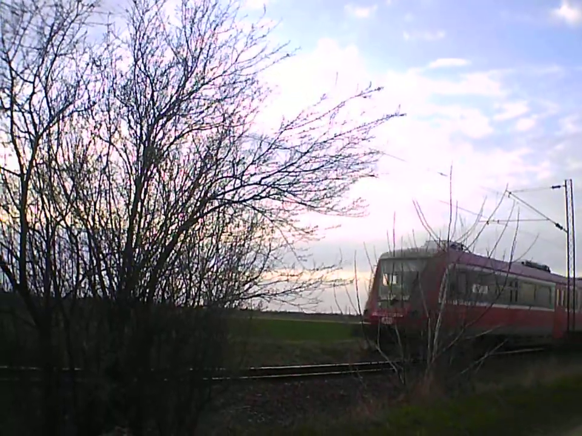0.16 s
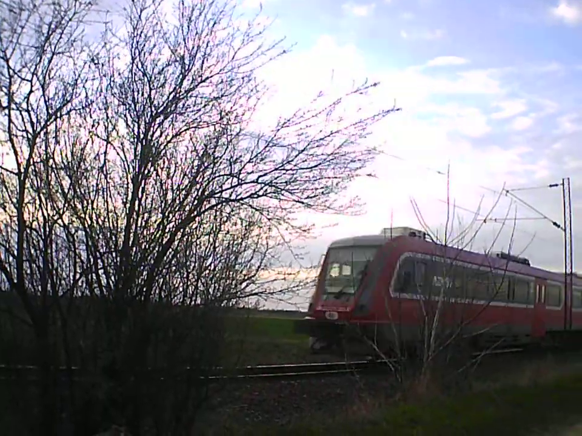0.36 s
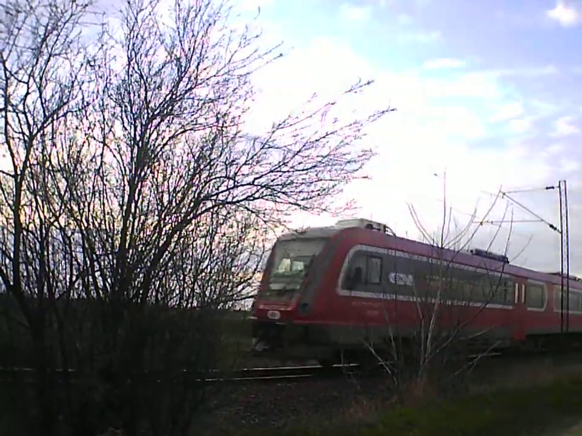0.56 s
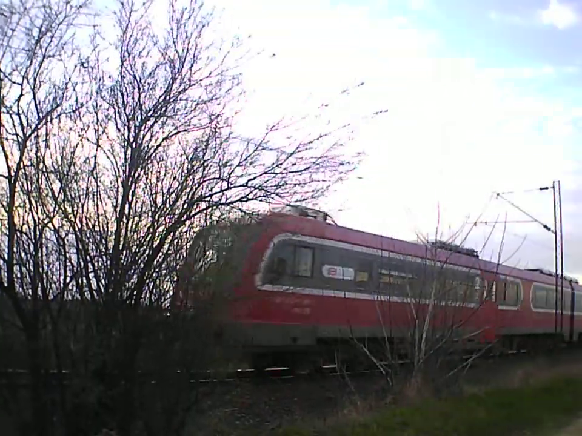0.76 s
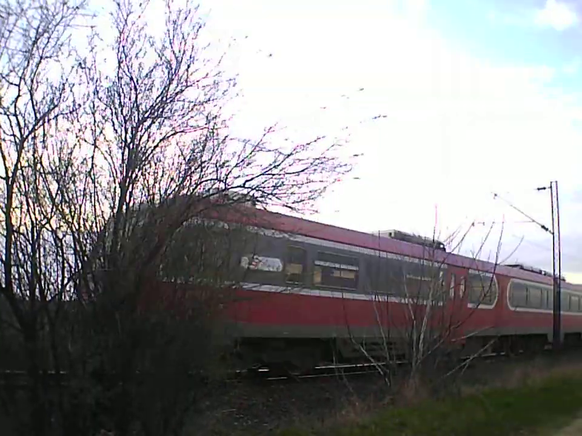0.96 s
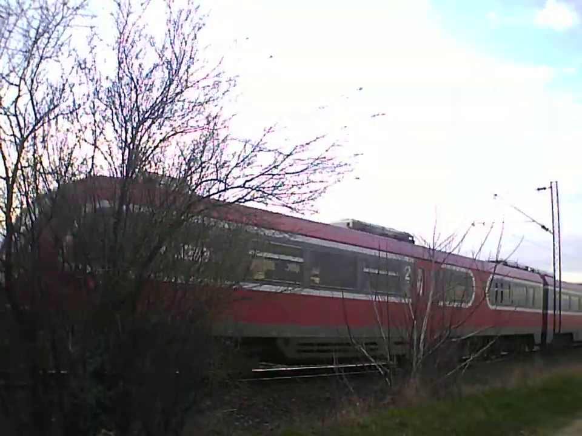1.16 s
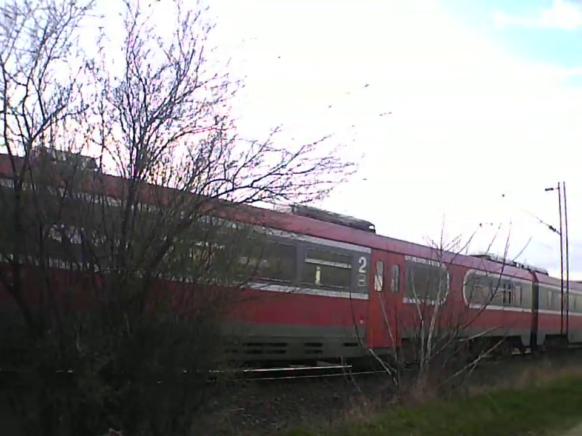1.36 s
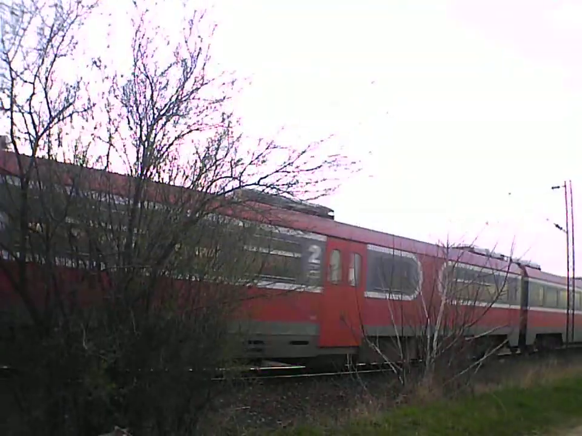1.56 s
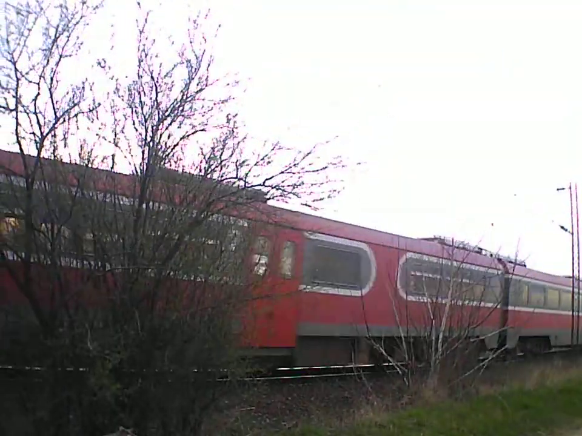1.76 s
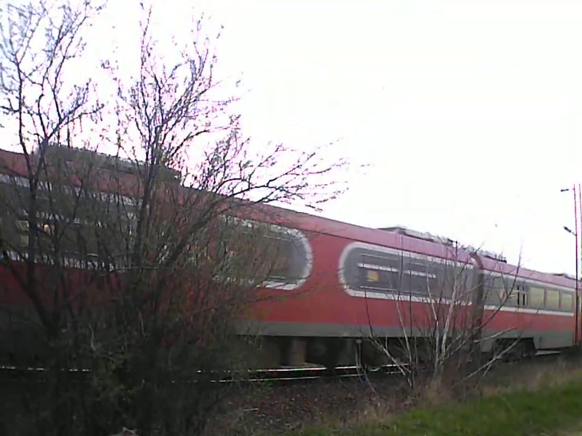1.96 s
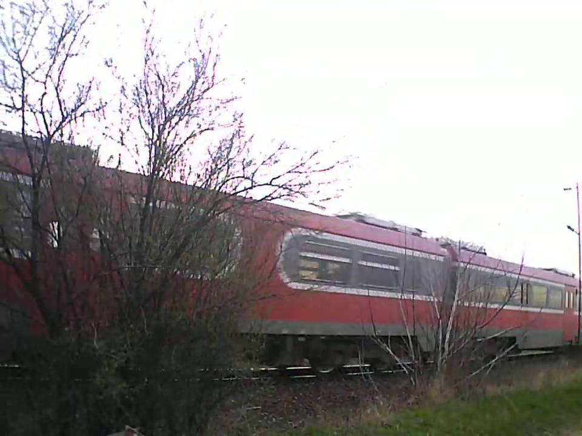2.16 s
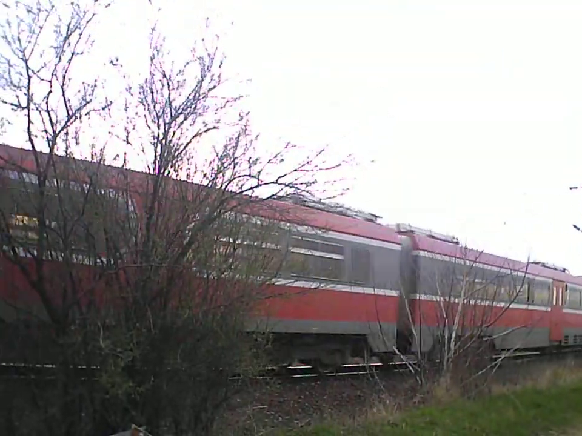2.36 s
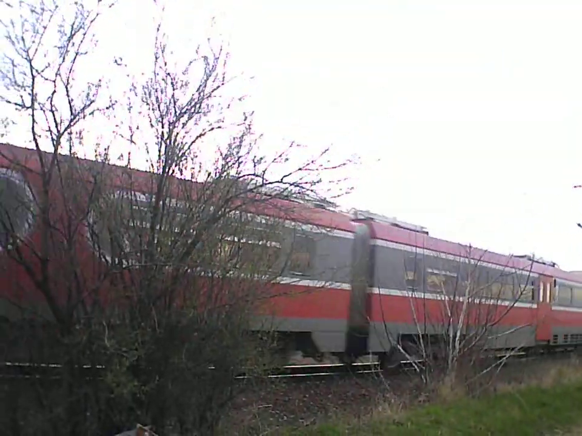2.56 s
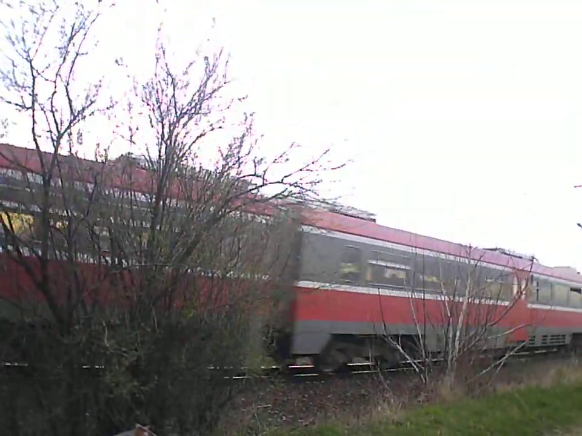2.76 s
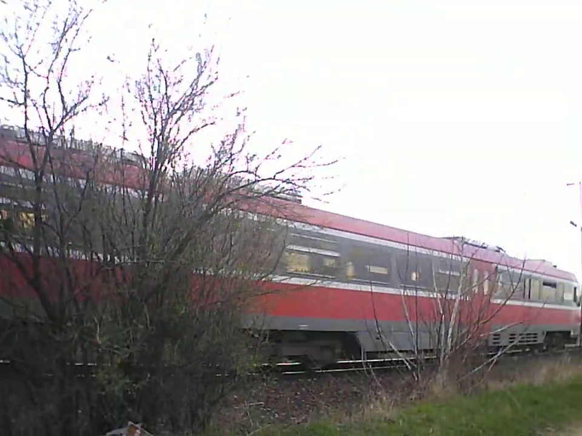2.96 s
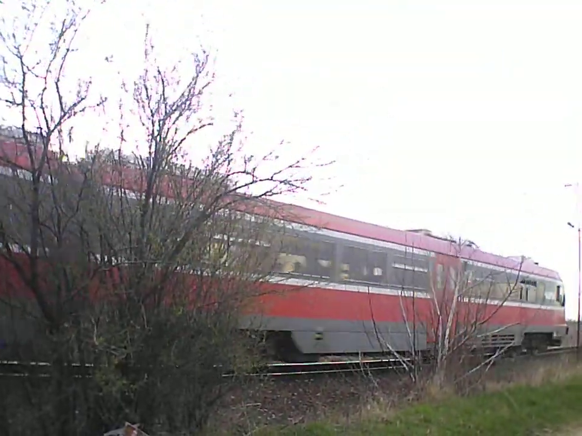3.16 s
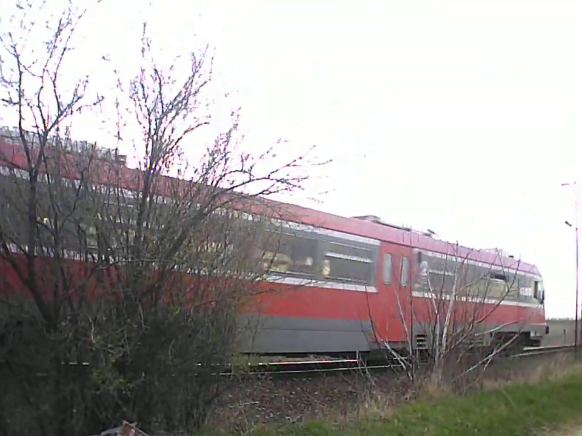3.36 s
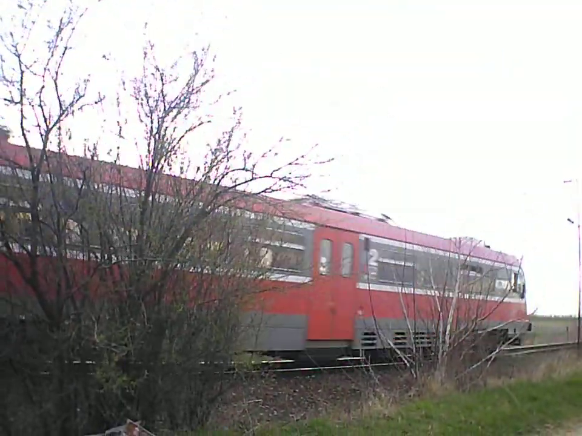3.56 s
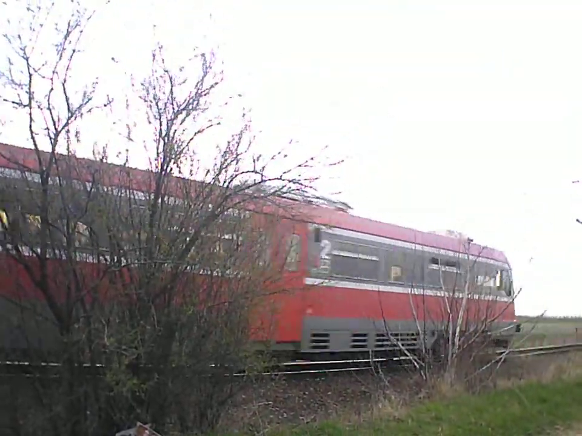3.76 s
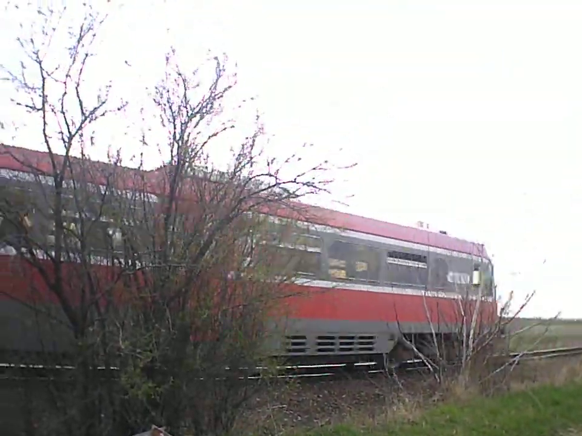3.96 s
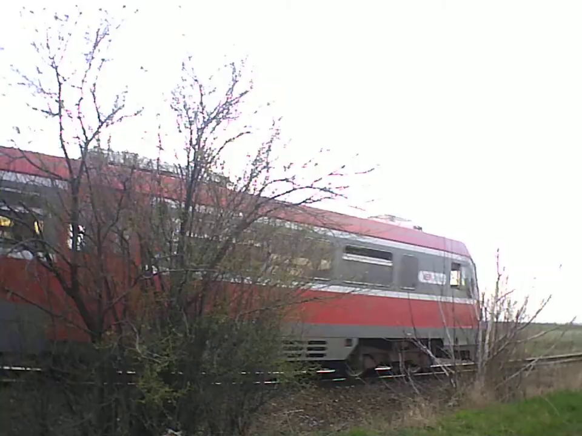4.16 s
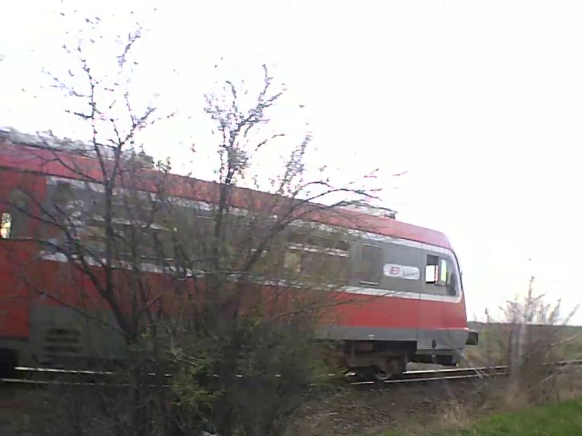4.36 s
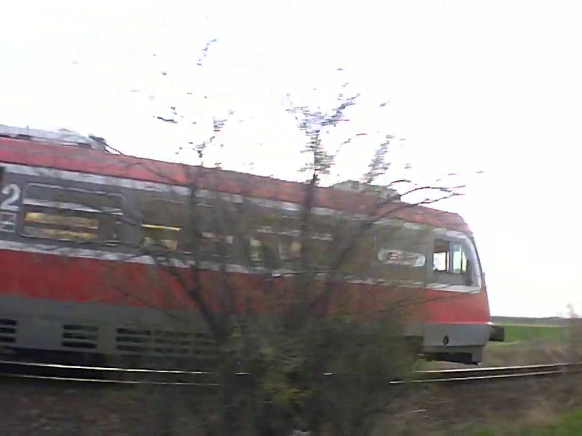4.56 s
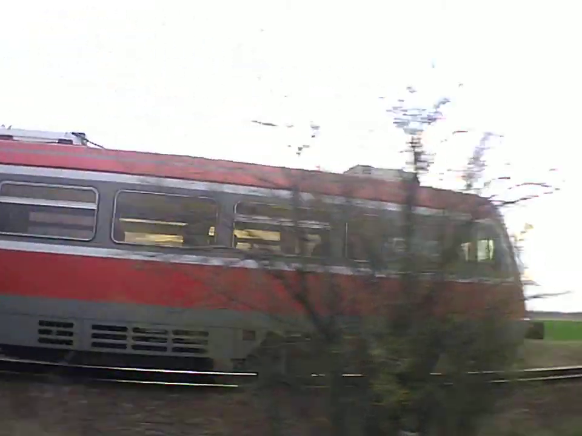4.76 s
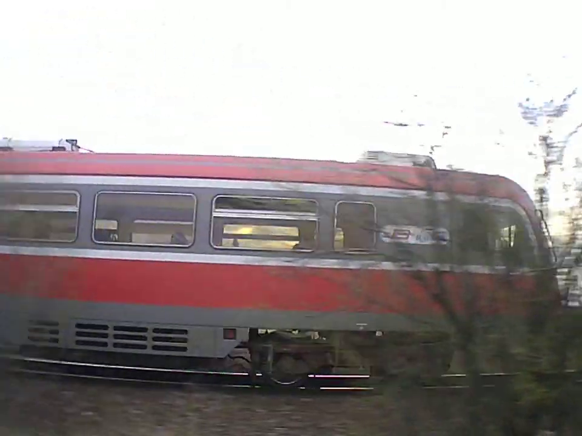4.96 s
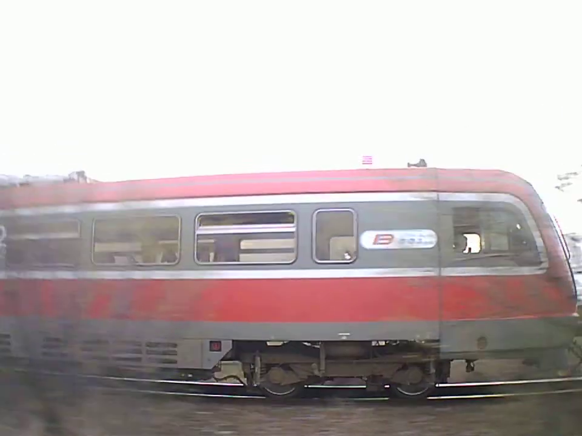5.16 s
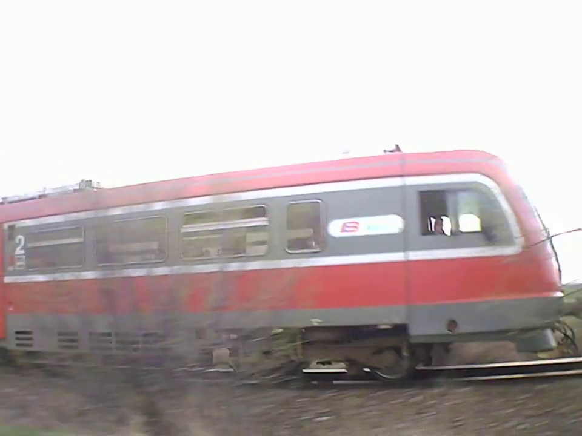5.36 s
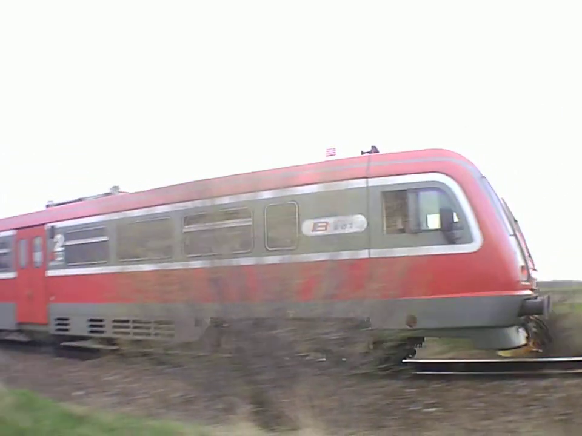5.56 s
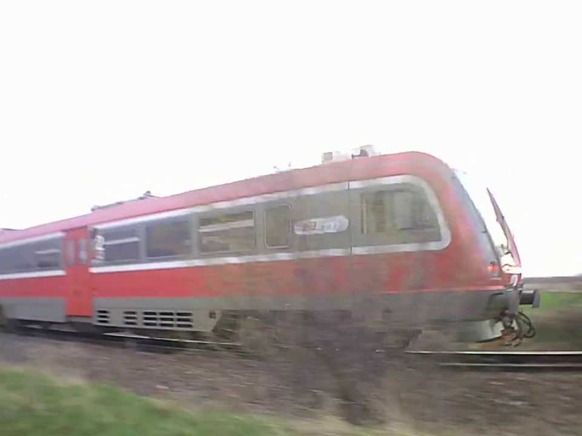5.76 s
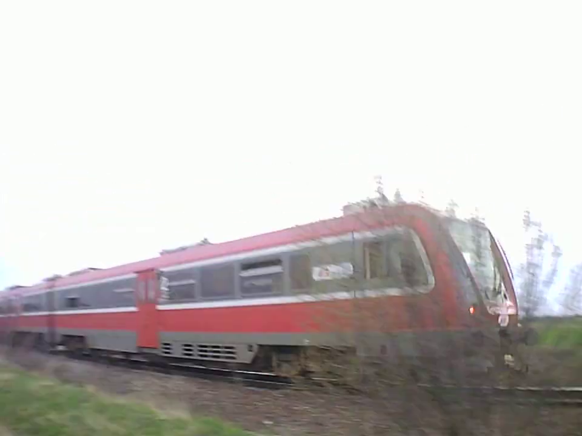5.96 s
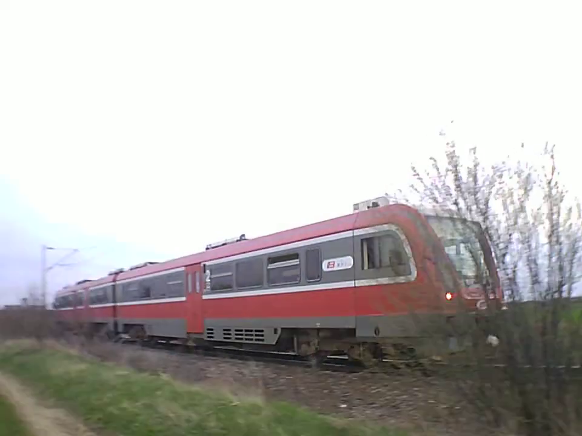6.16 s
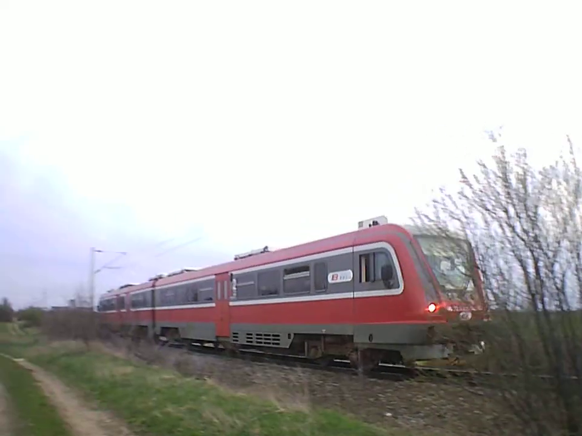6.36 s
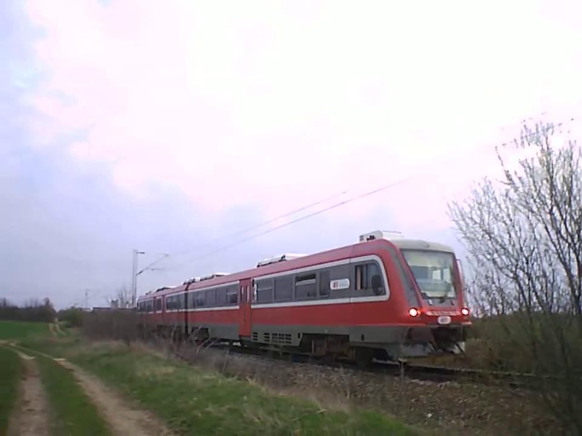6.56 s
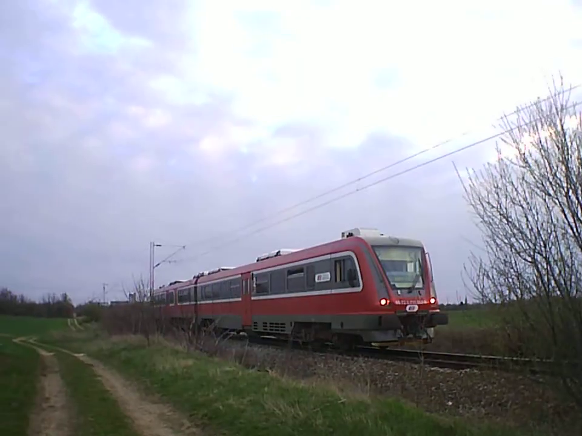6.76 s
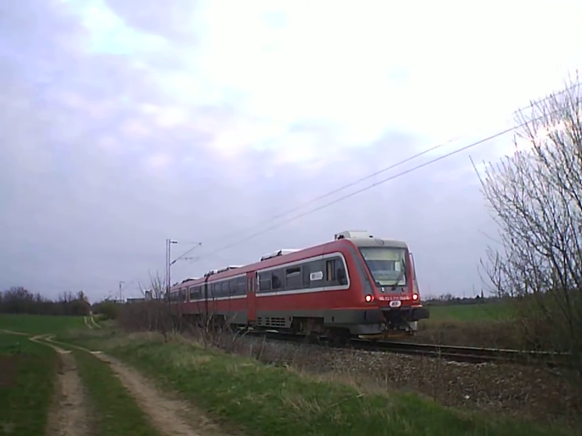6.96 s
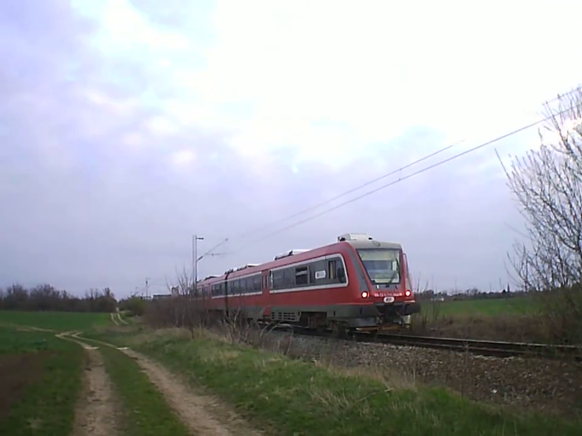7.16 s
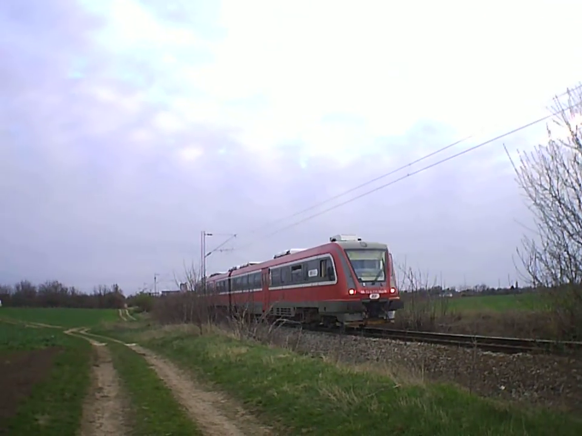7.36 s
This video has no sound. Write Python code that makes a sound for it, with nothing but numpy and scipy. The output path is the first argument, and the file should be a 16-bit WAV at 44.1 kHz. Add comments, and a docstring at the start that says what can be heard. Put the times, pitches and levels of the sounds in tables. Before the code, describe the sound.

Low throbbing engine and deep rolling roar of a passing railcar, pulsing with a flat wheel, thumping, whining faintly, then receding.

```python
"""A low engine throb and a growl open the scene as a two-car diesel train rolls past a few metres away and draws off.
The throb is a wandering tone near 42 Hz over low rumble; roar, growl, rolling and hiss are flickering coloured noise.
A flat wheel pulses them about four times a second early on. Swelling low cycles thump, clicks clatter, gear tones
whine and brief faint high tones flutter; wheel resonances waver in the rolling, over a faint microphone noise."""
import sys
import numpy as np
from scipy import signal
from scipy.fft import rfft, irfft, next_fast_len
from scipy.io import wavfile
from scipy.ndimage import uniform_filter1d

SR = 44100
rng = np.random.default_rng(int(sys.argv[2]) if len(sys.argv) > 2 else 0)


def dump_mix(stems):
    """Bounce the given channels to the path in sys.argv[1] as a 16-bit WAV at rate SR."""
    frames = np.atleast_2d(stems).T  # one column per channel
    limited = np.clip(frames, -1, 1)  # hard clip at full scale
    pcm = np.round(limited * 32767).astype(np.int16)
    wavfile.write(sys.argv[1], SR, pcm)


N = 327486   # length in samples


def from_db(db):
    """Decibels to gain."""
    return 10 ** (np.asarray(db) / 20)


def rms_one(x):
    """Scale to rms 1."""
    return x / np.sqrt(np.mean(x ** 2) + 1e-20)


def in_time(rows):
    """Columns of a curve table after its time column, drawn as one value a sample."""
    s, *columns = np.transpose(rows)
    return [np.interp(np.arange(N) / SR, s, column) for column in columns]


def drift(rate):
    """Slow chance of spread 1: noise smoothed twice below `rate` in Hz, computed every 40 samples."""
    r = np.exp(-2 * np.pi * rate * 40 / SR)
    noise = rng.standard_normal(N // 40 + 2002)
    slow = signal.lfilter([1], [1, -2 * r, r * r], noise)[2000:]   # the filter has settled by here
    return np.interp(np.arange(N) / 40, np.arange(len(slow)), rms_one(slow))


def coloured(x, spectrum):
    """Shape a steady sound by a spectrum drawn over log frequency; rms 1."""
    hz, level_db = np.transpose(spectrum)
    size = next_fast_len(N)
    log_hz = np.log(np.maximum(np.arange(size // 2 + 1) * SR / size, 1))
    gain = from_db(np.interp(log_hz, np.log(hz), level_db, -120, -120))
    return rms_one(irfft(rfft(x, size) * gain, size)[:N])


def patchy(spectrum, patchy_db, rate):
    """Coloured noise whose half-octave bands flicker partly together, partly alone; rms 1."""
    x = coloured(rng.standard_normal(N), spectrum)
    together = drift(rate / 2)
    lowest, highest = spectrum[0][0], min(spectrum[-1][0], 19000)
    flicker = 0
    for low in lowest * 2 ** np.arange(0, np.log2(highest / lowest), .5):
        band_pass = signal.butter(2, [low, low * np.sqrt(2)], "band", fs=SR, output="sos")
        gain = from_db(patchy_db * (0.53 * together + drift(rate)))
        flicker = flicker + signal.sosfilt(band_pass, x) * (gain - 1)
    return rms_one(x + flicker)


def resonate(x, hz, width_hz):
    """A resonance passed twice for steep skirts; rms 1."""
    r = np.exp(-np.pi * width_hz / SR)
    stage = [1, 0, -1, 1, -2 * r * np.cos(2 * np.pi * hz / SR), r * r]
    return rms_one(signal.sosfilt([stage, stage], x))


def grains(per_s, spread_db):
    """Random clicks of uneven size and either sign; rms 1."""
    sizes = from_db(spread_db * np.minimum(rng.exponential(1, N), 4)) * rng.choice([-1, 1], N)
    return rms_one(sizes * (rng.random(N) < per_s / SR))


def add(out, s, sound):
    """Mix a short sound in at time s."""
    i = round(s * SR)
    out[i:i + len(sound)] += sound[:N - i]


# The pass of the train; scene() rides the levels, wheel_turn() the last column.
# Each row: time in seconds, then levels before pulsing and flicker in dB of deep roar, body growl, rolling, hiss
# and 4 kHz ring, then share of the flat wheel's pulsing 0-1.
PASS = [(0, -45, -41, -48, -67.5, -79, 0.7), (.6, -35, -41, -47, -66, -68.5, 0.8),
        (1.1, -33.5, -43.5, -45.5, -62, -67.5, 0.85), (1.55, -33, -36.5, -41.5, -61, -58.5, 1),
        (2.1, -27.5, -36.5, -40.5, -55, -55, 0.56), (2.45, -33.5, -37.5, -40, -55.5, -57, 0.6),
        (2.98, -28.5, -42.5, -42.5, -61, -59.5, 0), (3.66, -30.5, -41.5, -42.5, -62, -60, 0.16),
        (3.85, -27.5, -40, -42, -60, -60.5, 0), (4.28, -32, -48, -42.5, -62.5, -62.5, 0.02),
        (4.75, -34.5, -41, -42.5, -61.5, -59, 0), (5.12, -31.5, -40.5, -42, -60, -62, 0.03),
        (5.76, -31, -38.5, -45.5, -66.5, -65, 0), (6.05, -37.5, -44, -46, -68.5, -69, 0),
        (6.2, -36.5, -50.5, -48.5, -68.5, -68, 0.08), (6.5, -39, -48.5, -50, -68, -71, 0.02),
        (7.12, -38, -54, -56.5, -73.5, -79, 0), (7.43, -40, -52.5, -57, -72.5, -91, 0.01)]
FLAT_LANDS_S, WHEEL_TURN_S = .225, .2412   # first landing of the flat, time of one turn


def wheel_turn(lag_s=0):
    """Flat-wheel pulse: drops after each landing, lulls, then builds; up to 1 from trough to crest, as PASS allows."""
    turn = (np.arange(N) / SR - FLAT_LANDS_S - lag_s) / WHEEL_TURN_S % 1
    pulse = np.interp(turn, [0, 0.22, 0.47, 0.69, 1], [.5, -.5, -.5, 0.2, .5])
    return in_time(PASS)[-1] * pulse


# Uneven level of the low throb and rumble, much of it chance, before further swelling.
# Each row: time in seconds, level in dB.
THROB = [(0.0, -34), (0.04, -31), (0.27, -36.5), (0.45, -27.5), (1.53, -28.5), (1.59, -34), (1.71, -21.5),
         (1.76, -27), (2.17, -23.5), (2.28, -34), (2.36, -22.5), (2.77, -23.5), (3.02, -33), (3.1, -19.5),
         (3.23, -38), (3.31, -24), (3.68, -35), (3.78, -29), (4.3, -30), (4.49, -21.5), (4.53, -33.5),
         (4.67, -19), (4.78, -34), (4.84, -23), (4.98, -43), (5.05, -26), (6.12, -23.5), (6.18, -33),
         (6.24, -28), (6.36, -33), (6.47, -27), (6.58, -38), (6.65, -30), (6.76, -37), (6.86, -32),
         (7.0, -37), (7.15, -40), (7.3, -32), (7.41, -34), (7.43, -45)]
# Spectrum of the lowest rumble. Each row: frequency in Hz, relative level in dB per Hz.
UNDERTOW = [(12, 1.5), (22, -6), (30, 5.5), (45, 5), (60, -14), (90, -11.5), (140, -23)]
THROB_HZ, THROB_WANDER_HZ = 42.1, 3.5
THROB_TONE = 0.34   # share of the power in the tone, the rest is rumble
THROB_SWELL_DB, THROB_SWELL_RATE_HZ = 1.2, 5   # chance swelling
THROB_PULSE_DB, THROB_LAG_S = 3, 0.033   # it pulses with the flat wheel, a little late


def throb():
    """Engine: a wandering firing tone over the lowest rumble, partly evened, then given its uneven level and pulse."""
    hz = THROB_HZ + THROB_WANDER_HZ * drift(1.2)
    tone = np.sqrt(2) * np.sin(2 * np.pi * np.cumsum(hz) / SR)
    rumble = coloured(rng.standard_normal(N), UNDERTOW)
    mix = np.sqrt(THROB_TONE) * tone + np.sqrt(1 - THROB_TONE) * rumble
    local_power = uniform_filter1d(mix ** 2, size=3000)   # over 68 ms
    even = mix / np.sqrt(local_power + 0.065)
    swell_db = THROB_SWELL_DB * drift(THROB_SWELL_RATE_HZ) + THROB_PULSE_DB * wheel_turn(THROB_LAG_S)
    return from_db(in_time(THROB)[0] + swell_db) * rms_one(even)


# Spectrum of the deep bogie roar. Each row: frequency in Hz, relative level in dB per Hz.
ROAR = [(32, -39), (55, 0.5), (70, -6.5), (102, -4.5), (170, -15.5), (220, -41), (370, -120)]


def roar():
    """Roar of the bogies: deep noise with gently flickering bands; rms 1."""
    return patchy(ROAR, patchy_db=1.0, rate=5.2)


# Spectrum of the body growl. Each row: frequency in Hz, relative level in dB per Hz.
GROWL = [(100, -48), (170, 3.5), (233, 0), (330, -10), (430, -21), (560, -74), (950, -120)]


def growl():
    """Body growl: low-mid noise whose bands flicker faster and deeper than the roar; rms 1."""
    return patchy(GROWL, patchy_db=2.5, rate=14.0)


# Two wheel resonances that slide as the bogies pass.
# Each row: time in seconds, frequency in Hz, level of a strand in dB relative to the rolling, width in Hz.
WHEEL_SONG_LOW = [(0, 1100, -29, 40), (.6, 1096, -5, 49.86), (.9, 1058, -5.5, 110.4),
                  (1.25, 1003, -3.5, 110.1), (1.5, 1021, -10, 119.5), (1.75, 1096, -8, 50.2),
                  (2.3, 1083, -10.5, 50.9), (2.7, 1068, -18, 50.9), (3.3, 1038, -32, 50.4),
                  (3.9, 996, -12, 60), (4.15, 1039, -12, 70), (4.4, 1102, -10, 69.8),
                  (4.9, 1079, -13, 80.1), (5.3, 1019, -8.5, 50.7), (5.8, 1052, -10.5, 58.7),
                  (6.2, 1050, -8, 50), (7.43, 1041, -24, 50)]
WHEEL_SONG_HIGH = [(0, 1296, -14, 59.8), (.7, 1267, -12, 60.2), (1.1, 1264, -22, 61),
                   (1.45, 1241, -15, 60.2), (2.1, 1260, -6.5, 39.5), (2.449, 1241, -13.5, 60.5),
                   (3.0, 1340, -11.5, 49.9), (3.351, 1401, -14.5, 70), (3.6, 1307, -18, 60.4),
                   (4.299, 1190, -10.5, 60.2), (4.85, 1200, -7.5, 39.53), (5.2, 1224, -19, 59.9),
                   (6.0, 1242, -17, 61), (6.5, 1384, -19, 40.2), (7.43, 1414, -13, 40.05)]


def wheel_song():
    """Rail roughness rings each sliding resonance: strands waver across its width, cross, and come and go."""
    out = 0
    for table in (WHEEL_SONG_LOW, WHEEL_SONG_HIGH):
        hz, level_db, width_hz = in_time(table)
        for place in (-.6, 0, .6):   # three strands, placed in shares of the width
            strand_hz = hz + width_hz * (place + .3 * drift(6))
            phase = 2 * np.pi * np.cumsum(strand_hz) / SR
            out = out + from_db(level_db) * drift(15) * np.cos(phase)
    return out


# Rolling noise heard side-on, from ahead (with ground-echo dips) and from behind, then its coarse contacts.
# Each row: frequency in Hz, relative level in dB per Hz.
ROLLING_NEAR = [(250, -5), (420, -2), (477, -9), (637, -3.5), (711, -3), (836, -4), (1100, -3),
                (1440, -4.5), (1770, -16), (2150, -16), (3200, -25.5), (4160, -69), (7040, -120)]
ROLLING_AHEAD = [(250, -54), (420, -22), (533, -3.5), (705, -3.5), (755, -7.5), (1030, 3.5), (1490, -4),
                 (1650, -8.5), (1720, -32), (2010, -7.5), (2870, -28), (3200, -31), (4160, -65),
                 (7040, -120)]
ROLLING_BEHIND = [(250, -72), (420, -16.5), (659, -3), (705, -4.5), (755, -8), (1080, -7.5), (1570, -13),
                  (1710, -16), (1890, -18), (3200, -30), (4160, -70), (7040, -120)]
GRIT = [(500, -28), (750, -5), (1100, 2), (1500, -4.5), (2100, -15.5), (3000, -48)]
# Where the train is heard from; the rest comes from ahead.
# Each row: time in seconds, share side-on 0-1, share from behind 0-1.
ASPECT = [(0, 0.36, 0.04), (1.0, 0.17, 0.03), (1.6, 0.5, 0.15), (1.9, 0.99, 0.01), (5.7, 0.95, 0.04),
          (6.25, 0, 0.99), (7.4, 0.01, 0.81)]
GRIT_PER_S, GRIT_DB = 500, -11   # coarse contacts; typical level relative to the rolling noise


def rolling():
    """Wheel on rail: noise coloured by the side the train shows, with wheel song and coarse contacts; rms near 1."""
    side_on, behind = in_time(ASPECT)
    ahead = np.maximum(1 - side_on - behind, 0)
    near, front, back = (patchy(spectrum, patchy_db=1.22, rate=8.7)
                         for spectrum in (ROLLING_NEAR, ROLLING_AHEAD, ROLLING_BEHIND))
    noise = np.sqrt(side_on) * near + np.sqrt(ahead) * front + np.sqrt(behind) * back
    grit = from_db(GRIT_DB + 2.4 * drift(10)) * coloured(grains(GRIT_PER_S, 2.8), GRIT)
    return noise + wheel_song() + grit


# Wheel and rail-joint thumps. Each row: start in seconds, nominal peak in dB, frequency in Hz,
# frame level in dB relative to that peak, crack level in dB relative to that peak.
THUMPS = [(.158, -34.5, 290, 1, -20), (0.217, -25, 230, -5, -14), (0.426, -35.5, 197, 6.5, -2),
          (0.461, -25.5, 118, -1, -18), (.648, -31, 320, -3, -13), (.691, -26.5, 137, -3.5, -22),
          (.925, -23.5, 125, -20, -28), (1.082, -27, 126.5, -11, -23), (1.172, -17, 107.6, -19, -33),
          (1.368, -24, 144, -8, -23), (1.411, -20.5, 126, -15, -15), (1.582, -26, 148, -23, -22),
          (1.656, -16.5, 117, -27, -15.5), (1.822, -26.5, 161.4, 1.5, -13), (1.858, -23, 150.2, -11, -23),
          (1.892, -16.5, 166, -33, -27), (2.145, -15.5, 120.5, -38, -30), (2.393, -25.5, 140, -17, -15),
          (2.619, -24.5, 117, -6, -23), (2.884, -24, 142, -11, -23), (3.089, -30, 70.8, 2, -27),
          (3.783, -27, 158, -7, -10), (3.881, -22.5, 172, -5.5, -26), (3.988, -25.5, 230, -2, -20),
          (4.082, -29.5, 156.3, -11, -23), (4.158, -21.5, 99.7, -13, -18), (4.467, -24, 300, -4, -16),
          (4.661, -22.5, 130.6, -26, -17), (5.734, -28.5, 127.6, 0, -19), (5.845, -29, 110, -1.5, -22),
          (6.044, -23.5, 94.9, -5.5, -18)]
# Modes of the bogie frame, varied a little at each thump.
# Each row: frequency in Hz, relative level in dB, time to fall 60 dB in seconds.
FRAME_MODES = [(202, -1, 0.08), (267.6, 0, 0.091), (337, -1, 0.053), (466, -10.5, 0.084)]
THUMP_SWELL_CYCLES = 1.18   # cycles until the swell crests
CRACK_DELAY_S, CRACK_DECAY_S = .003, .006


def thumps():
    """A few low cycles swell fast and die, with a short crack in the rail's range and freshly struck frame modes."""
    out, t = np.zeros(N), np.arange(round(.12 * SR)) / SR
    onset = 1 - np.exp(-t / 0.0037)
    late = np.maximum(t - CRACK_DELAY_S, 0) / CRACK_DECAY_S
    for s, peak_db, hz, frame_db, crack_db in THUMPS:
        swell = hz * t / THUMP_SWELL_CYCLES
        body = np.sin(2 * np.pi * hz * t) * swell ** 2 * np.exp(2 - 2 * swell)
        noise = resonate(rng.standard_normal(len(t)), 830, 640)
        crack = noise * 2 * np.sqrt(late) * np.exp(-late)
        frame = np.zeros(len(t))
        for mode_hz, level_db, t60 in FRAME_MODES:
            more, off = rng.standard_normal(2)   # chance in level and in pitch
            decay = from_db(level_db + 3.5 * more - 60 * t / t60)
            frame += decay * np.sin(2 * np.pi * mode_hz * (1 + 0.041 * off) * t)
        add(out, s, from_db(peak_db) * (from_db(crack_db) * crack + from_db(frame_db) * frame * onset - body))
    return out


# Gear whine of the rear power bogie, falling overall as it passes.
# Each row: time in seconds, base frequency in Hz, then levels in dB rms of the three tones before unsteadiness and beat.
WHINE = [(3.55, 742, -75, -75, -95), (3.75, 739, -62, -52, -90), (4.02, 736, -64, -55, -85),
         (4.09, 734, -51, -62, -82), (4.45, 727, -48, -54, -80), (4.75, 720, -50, -51, -78),
         (4.92, 714, -50, -51, -76), (5.1, 712, -50, -52, -74), (5.2, 711, -50, -60, -72),
         (5.4, 710, -48, -62, -69), (5.5, 707, -54, -63, -70), (5.8, 705, -58, -64, -71),
         (6.05, 708, -64, -66, -70), (6.35, 708, -60, -62, -65), (6.6, 707, -63, -67, -69),
         (7.0, 703, -71, -70, -76), (7.43, 701, -70, -66, -82)]
# The three tones. Each row: multiple of the base frequency, unsteadiness in dB, depth of the beat 0-1.
WHINE_ORDERS = [(1, 2.4, 0), (1.51, 2.5, 1), (2.49, 2.5, 0)]
BEAT_CREST_S, BEAT_S = 4.735, .158   # the middle tone swells evenly: one crest, time between crests


def whine():
    """Gear-mesh tones, each unsteady in pitch and strength."""
    hz, *levels_db = in_time(WHINE)
    beat = np.cos(2 * np.pi * (np.arange(N) / SR - BEAT_CREST_S) / BEAT_S)
    tones = 0
    for (multiple, shake_db, depth), level_db in zip(WHINE_ORDERS, levels_db):
        strength = from_db(level_db + shake_db * drift(25)) * (1 + depth * beat)
        tone_hz = multiple * hz * (1 + 0.001097 * shake_db * drift(16.8))
        tones = tones + strength * np.sin(2 * np.pi * np.cumsum(tone_hz) / SR)
    return np.sqrt(2) * tones


# Loose gear shaken into clatter.
# Each row: crest in seconds, level in dB before the tilt, length scale in seconds, tilt above 5 kHz in dB.
CLATTER = [(0.207, -56, .04, 11), (0.234, -44, 0.016, -4), (0.4, -47.5, 0.059, 2), (0.456, -46, 0.063, 6.5),
           (0.643, -45, 0.018, -3), (0.702, -45.5, .015, -6), (0.947, -49, 0.039, -5),
           (1.139, -45, 0.19, 5.5), (1.375, -47, 0.025, 3), (1.424, -47, 0.038, 9), (1.618, -46, 0.045, 2),
           (1.658, -43, 0.019, 6), (1.831, -39.5, 0.045, 6.5), (1.904, -35.5, 0.021, 1),
           (2.069, -44, 0.04, 7), (2.138, -44, .03, 4), (2.295, -59, .06, 4), (2.416, -42.5, 0.038, 6),
           (2.818, -52, 0.0096, -3), (2.898, -44, 0.017, 0), (3.806, -47.5, 0.055, 6.5),
           (4.005, -44, 0.023, 0), (4.117, -50, 0.016, -5), (4.483, -45.5, 0.052, 5.5),
           (4.684, -45.5, 0.058, 6.5), (5.38, -49, 0.022, 7), (5.855, -47, 0.087, 6),
           (5.934, -58, 0.041, 9), (6.051, -42.5, 0.05, -1), (6.128, -49, 0.04, 2)]
# Spectrum of the clatter. Each row: frequency in Hz, relative level in dB per Hz.
CLATTER_COLOUR = [(300, -21), (600, 18.5), (1200, 15.5), (2200, 4), (3200, -2), (4300, 0), (6300, -10.5),
                  (7400, -8), (10500, -21), (12500, -8.5), (14000, -25), (15500, -36)]


def clatter():
    """Loose gear: dense clicks under the swell of each shake; the tilt weighs the part above 5 kHz."""
    clicks = coloured(grains(5000, 2), CLATTER_COLOUR)
    top = signal.sosfilt(signal.butter(2, 5000, "high", fs=SR, output="sos"), clicks)
    out = np.zeros(N)
    for s, level_db, length, tilt_db in CLATTER:
        span = slice(max(round((s - 2 * length) * SR), 0), round((s + 5 * length) * SR))
        t = (np.arange(N)[span] / SR - s) / length
        rise, fall = np.exp(-14 * t * t), np.exp(-.9 * np.maximum(t, 0) ** 1.3)
        swell = np.where(t < 0, rise, fall)   # rises faster than it dies
        tilted = clicks[span] + (from_db(tilt_db) - 1) * top[span]
        out[span] += from_db(level_db) * swell * tilted
    return out


# A hollow knock and its bounce. Each row: start in seconds, strength in dB.
KNOCKS = [(0.7342, -20.5), (.827, -39)]
# Modes of the knocked body. Each row: frequency in Hz, relative level in dB, time to fall 60 dB in seconds.
KNOCK_MODES = [(493, -18, 0.073), (626, -2.5, 0.043), (710, -8.5, 0.065), (830, -8, 0.025),
               (1060, -26, 0.02)]


def knocks():
    """Short modes struck together by a soft contact."""
    out, t = np.zeros(N), np.arange(round(.1 * SR)) / SR
    body = sum(from_db(level_db - 60 * t / t60) * np.sin(2 * np.pi * hz * t) for hz, level_db, t60 in KNOCK_MODES)
    soft_onset = np.minimum(t / 0.0011, 1)
    for s, blow_db in KNOCKS:
        add(out, s, from_db(blow_db) * body * soft_onset)
    return out


# Brief faint high tones.
# Each row: start in seconds, length in seconds, frequency in Hz, crest level in dB rms before the flutter.
HIGH_TONES = [(.005, .03, 13300, -64), (.41, .035, 13200, -70), (.633, .025, 13200, -67),
              (.38, 0.025, 5060, -61), (.427, 0.033, 5120, -61), (0.377, 0.026, 11700, -67),
              (.478, 0.04, 13200, -63), (1.225, .06, 7170, -69), (1.785, 0.032, 10230, -69),
              (2.0, 0.037, 13170, -67), (2.14, .02, 5050, -64), (2.728, 0.043, 13430, -63),
              (3.33, 0.029, 7150, -62), (5.892, 0.017, 13530, -71)]


def high_tones():
    """Thin high tones that flutter quickly in level."""
    out = np.zeros(N)
    for s, length, hz, level_db in HIGH_TONES:
        t = np.arange(round(length * SR)) / SR
        swell = np.sin(np.pi * t / length) ** 0.83
        add(out, s, from_db(level_db) * np.sqrt(2) * swell * np.sin(2 * np.pi * hz * t))
    flutter = from_db(4.0 * drift(69))
    return out * flutter


# Centre of the ring, sagging overall as the train leaves. Each row: time in seconds, frequency in Hz.
RING = [(0, 4220), (1.2, 3876), (2.2, 3930), (4.0, 3890), (5.0, 3890), (7.4, 3784)]
RING_HALF_WIDTH_HZ = 257


def ring():
    """Dense contacts heard through one broad resonance: slow grains carried on its moving centre; rms 1."""
    phase = 2 * np.pi * np.cumsum(in_time(RING)[0]) / SR
    slow = signal.butter(2, RING_HALF_WIDTH_HZ, fs=SR, output="sos")
    a, b = signal.sosfilt(slow, [grains(3000, 2.5), grains(3000, 0.53)])
    return rms_one(a * np.cos(phase) + b * np.sin(phase))


# Spectrum of the hiss. Each row: frequency in Hz, relative level in dB per Hz.
HISS = [(2590, -16), (4400, -0.5), (4740, -3.5), (5320, -3.5), (5810, -1.5), (6530, -6.5), (7030, 0.5),
        (7760, -2), (10800, -16), (11800, -5.5), (13100, -8.5), (14100, -13), (14700, -23), (15500, -28)]


def hiss():
    """Treble noise with fast-flickering bands and a sprinkle of uneven clicks; rms near 1."""
    return patchy(HISS, patchy_db=1.5, rate=50.0) + 0.12 * coloured(grains(1400, 6.6), HISS)


# Spectrum of the microphone noise. Each row: frequency in Hz, relative level in dB per Hz.
FLOOR = [(1470, -69), (2500, 4.5), (3310, -5.5), (4330, 0), (6390, -11.5), (7210, -26), (10500, -9.5),
         (11900, -11.5), (15500, -19)]
FLOOR_DB = -68.5   # rms


def microphone_noise():
    """Steady coloured noise behind everything."""
    return from_db(FLOOR_DB) * coloured(rng.standard_normal(N), FLOOR)


def scene():
    """All sources at one microphone; each noise follows the pass and pulses with the flat wheel by its own dB."""
    roar_db, growl_db, rolling_db, hiss_db, ring_db, _ = in_time(PASS)
    pulse = wheel_turn()
    low = from_db(roar_db + 7.5 * pulse) * roar() + from_db(growl_db + 9.5 * pulse) * growl()
    wheels = from_db(rolling_db + 1.5 * pulse) * rolling()
    treble = from_db(hiss_db + 4.5 * pulse) * hiss() + from_db(ring_db + 5 * pulse) * ring()
    jitter = from_db(1.2 * drift(40))   # running gear shakes as one
    steady = throb() + low + wheels + whine() + jitter * treble
    events = thumps() + clatter() + knocks() + high_tones()
    return (steady + events + microphone_noise())[None]


def record(dry):
    """The top is cut steeply above 15.7 kHz and the whole wave sits a little below zero."""
    steep = signal.ellip(12, .5, 60, 15700, fs=SR, output="sos")
    return signal.sosfilt(steep, dry) - .0112


dry = scene()
out = record(dry)
dump_mix(out)
```